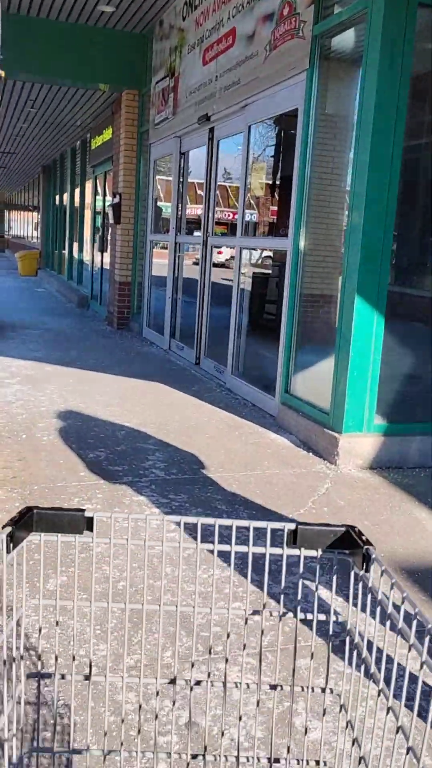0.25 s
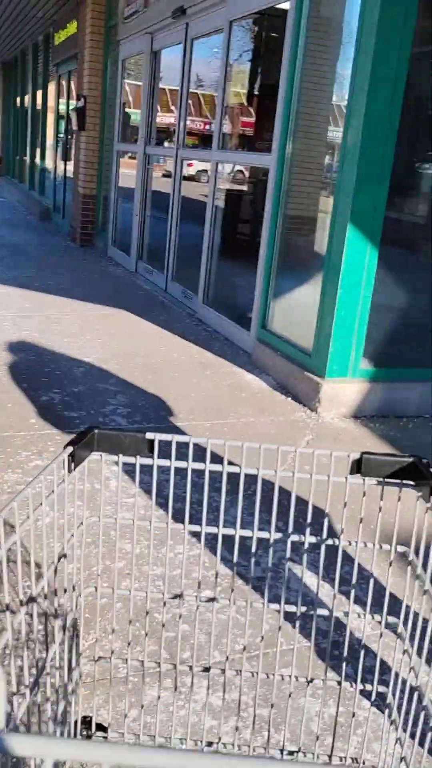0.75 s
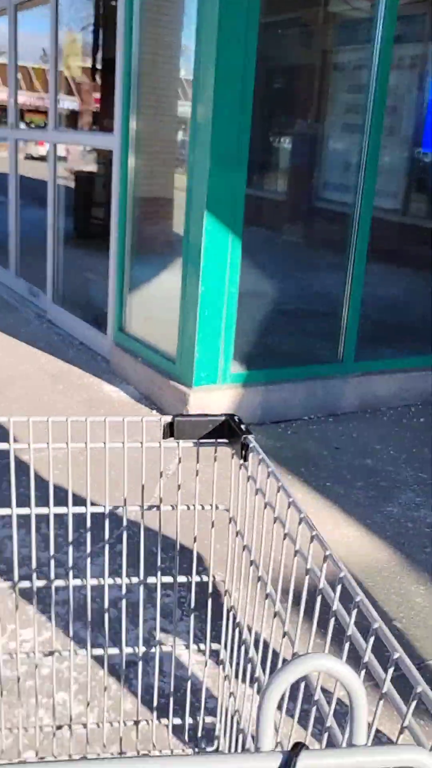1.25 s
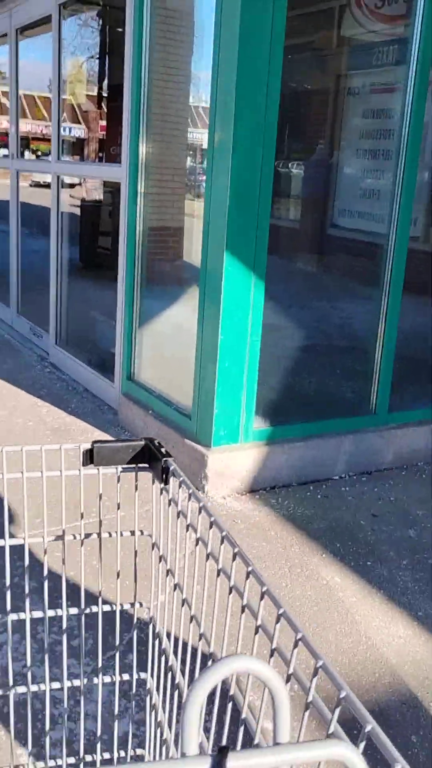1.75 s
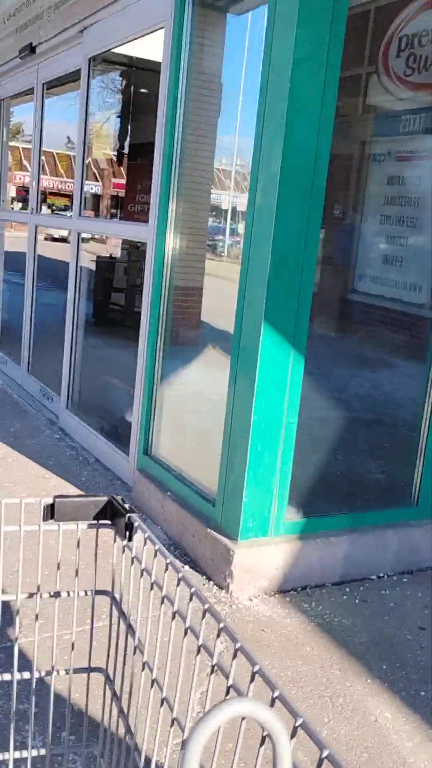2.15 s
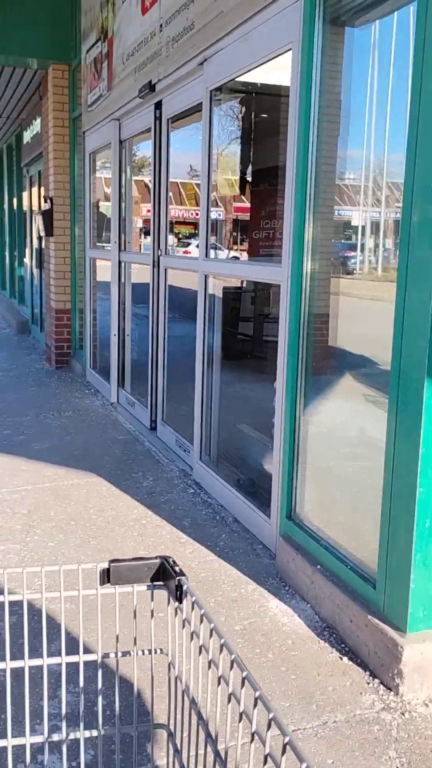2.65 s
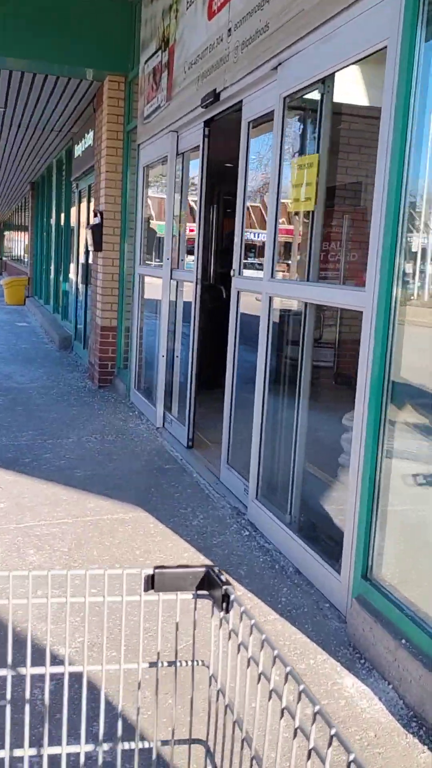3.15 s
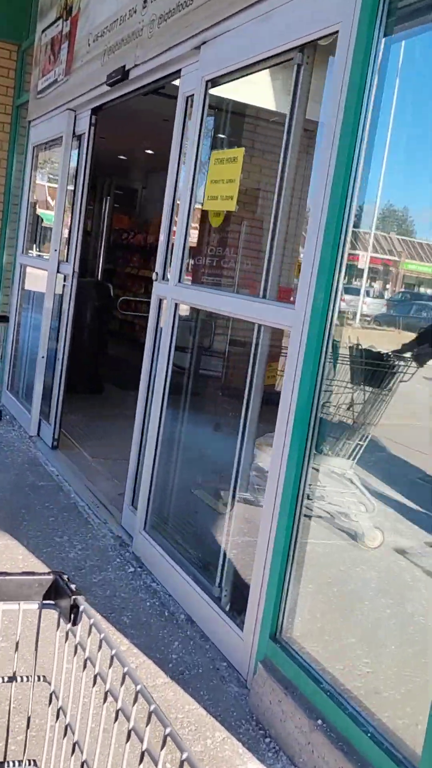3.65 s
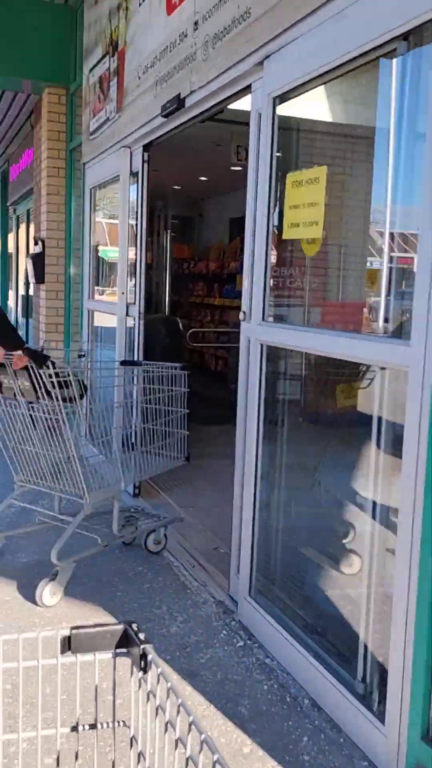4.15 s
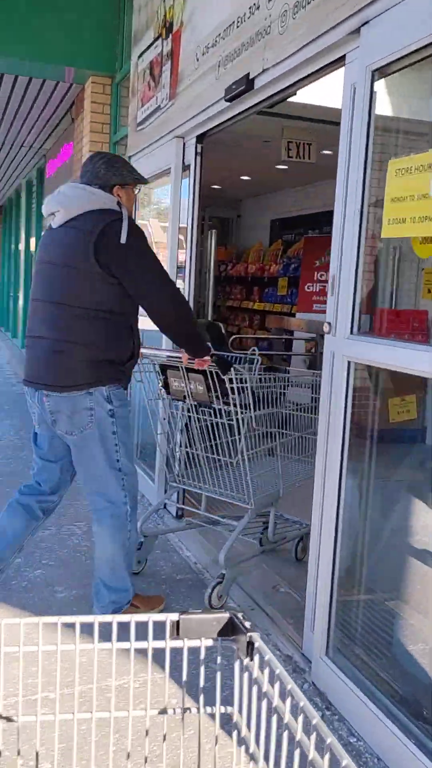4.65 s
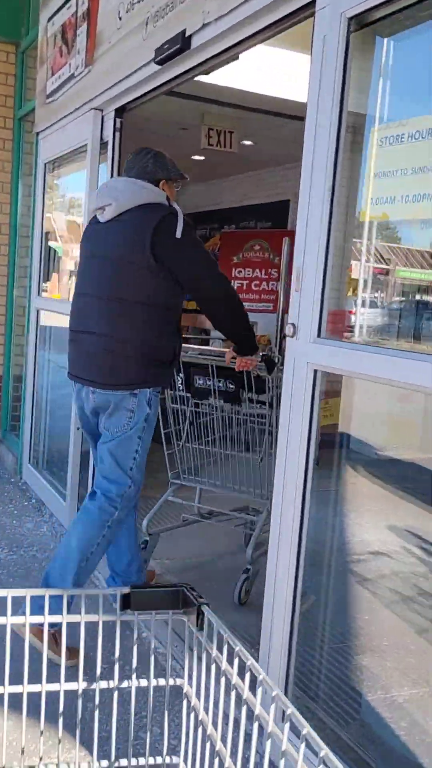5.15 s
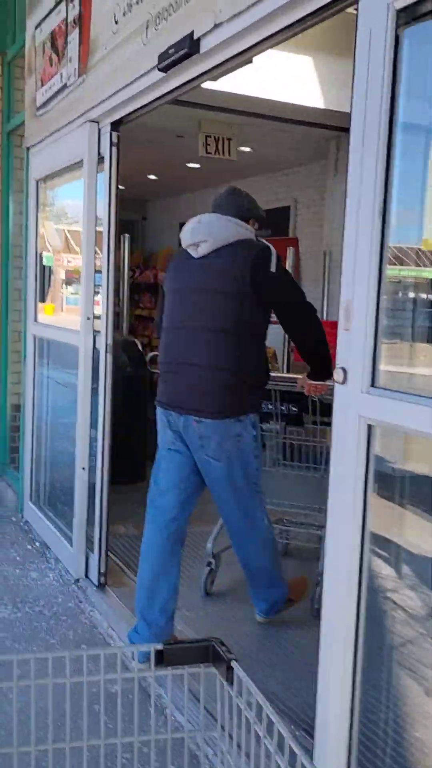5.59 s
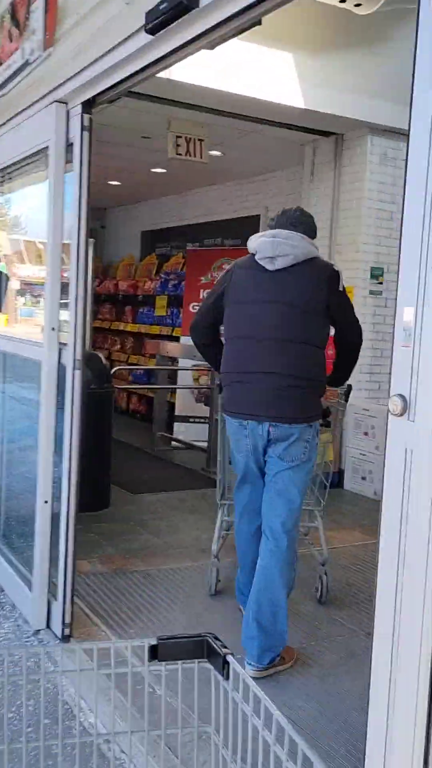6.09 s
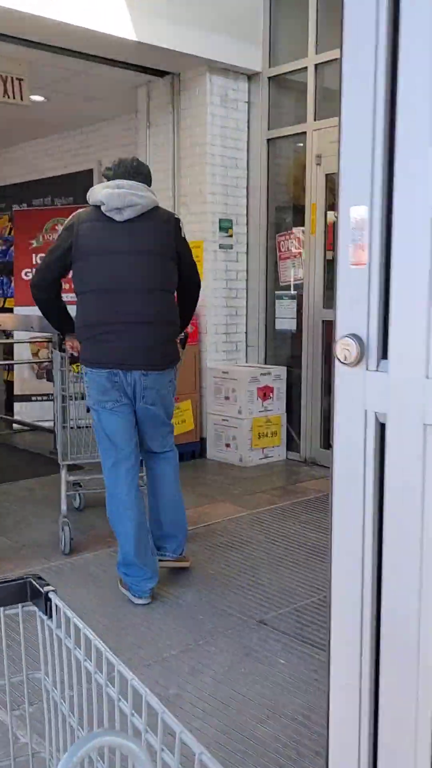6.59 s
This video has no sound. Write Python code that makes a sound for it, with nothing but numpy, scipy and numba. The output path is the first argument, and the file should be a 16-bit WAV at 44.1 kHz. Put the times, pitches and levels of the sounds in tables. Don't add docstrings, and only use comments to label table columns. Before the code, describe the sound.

An empty wire shopping cart rattles loudly and brightly over gritty concrete, then quietens to light ticks and low thuds at a shop entrance.

```python
import sys
import numpy as np
from scipy import signal
from scipy.io import wavfile
from scipy.ndimage import uniform_filter1d
from numba import njit

SR = 44100
rng = np.random.default_rng(int(sys.argv[2]) if len(sys.argv) > 2 else 0)


def natural_amplitude(level_db):
    exponent = np.asarray(level_db, float) / 20
    return 10 ** exponent


def inscribe(sig):
    pcm = np.round(np.clip(np.atleast_2d(sig).T, -1, 1) * 32767)
    wavfile.write(sys.argv[1], SR, pcm.astype(np.int16))


N = 300930
TIME = np.arange(N) / SR
USUAL_DB = -22

# start_s, peak_db, ring_hz, neighbour_spray_db
JOLTS = [(0.062, -5.5, 8630, -5), (0.2227, -7, 9500, -6), (0.2738, -8, 10000, -8), (0.9056, -4.5, 9230, -1),
         (0.963, -9, 4940, 4), (1.2206, -6, 10600, -7), (1.265, -7, 8770, 5), (1.331, 2, 4490, -18),
         (1.617, -3, 4350, 1), (2.0536, -11, 6880, 5.5), (2.2658, -14, 7700, 10.5), (2.3885, -14, 9180, -1),
         (2.423, -4.5, 6630, -1), (2.8384, -9, 7370, 4.5), (2.889, -10, 8600, -9), (2.9281, -5, 7000, -0.5),
         (2.9891, -15, 8070, 0), (3.249, -10, 8500, 4), (3.528, -7, 8500, 3.5), (3.953, -2, 8400, -6),
         (4.025, -6.5, 8100, 3.5), (4.126, -5, 8540, -4), (4.322, -10, 8300, 2), (5.088, -4.5, 4250, 0),
         (5.3327, -13, 4000, -5), (5.875, -15, 10980, -1), (6.1996, -15, 9740, -9), (6.534, -15, 6200, 10),
         (6.682, -17, 7840, -4), (6.799, -11.5, 8040, 6.5)]
# start_s, peak_db, ring_hz, neighbour_spray_db
MORE_JOLTS = [
    (0.1555, -15, 9280, -9),
    (1.683, -1, 9400, -3),
    (1.9795, -14.5, 6400, 2),
    (3.744, -14, 8490, -8),
    (4.796, -15, 8500, 1),
    (5.746, -14.5, 7540, 7),
    (6.053, -18, 8660, -2),
    (6.483, -20, 7200, -1),
]
# time_s, left_minus_right_db
SWAY = [(0, -3), (.55, 1), (.9, -4.5), (1.1, 1.5), (1.27, -4.5), (1.45, 3), (1.6, -3.5), (2.75, -3),
        (3.1, -0.5), (3.3, -4), (4.0, -5.5), (4.25, 0), (4.57, 2), (4.7, -4.5), (5.13, 0.5), (5.35, -3.5),
        (6.3, -1), (6.55, -4)]
# start_s, frame_db, casters_db, thud_db
BUMPS = [(0.05, -45, -26.5, -33), (0.23, -39, -55, -45), (0.6, -38, -22.5, -39), (0.695, -31, -22.5, -45),
         (0.76, -27.5, -26, -39), (1.0, -24.5, -21.5, -33), (1.3, -44, -41, -33), (1.67, -21, -47, -35),
         (1.85, -46, -46, -29.5), (1.98, -26, -37, -51), (2.102, -19, -28.5, -45), (2.33, -45, -46, -27),
         (2.65, -20.5, -42, -47), (2.95, -25, -36, -32), (3.27, -27, -28, -23), (3.42, -29, -33, -25),
         (3.6, -27.5, -45, -40), (3.77, -25, -34, -22.5), (4.36, -21, -31, -26), (4.46, -20.5, -26, -28),
         (4.62, -27, -28, -29), (4.78, -46, -40, -22.5), (5.0, -37, -44, -27), (5.2, -41, -51, -28),
         (5.37, -25, -34, -21.5), (5.45, -22.5, -32, -37), (6.23, -27.5, -38, -32), (6.43, -56, -55, -28),
         (6.55, -50, -25, -40), (6.8, -46, -31, -28)]
# time_s, level_db
DRAUGHT = [(0, -70), (1.5, -53), (2.3, -44), (3.15, -44), (3.25, -37), (4.05, -34.5), (4.15, -39),
           (4.52, -43), (4.62, -31.5), (5.3, -38.5), (5.5, -37.5), (6.82, -52)]


def curves(table, t):
    s, *columns = np.transpose(table)
    return [np.interp(t, s, c) for c in columns]


def colour(table, hz):
    table = np.array(table)
    return np.interp(np.log(hz), np.log(table[:, 0] + 1), table[:, 1])


@njit
def ring(start, hz, t60, rise, gain, phase):
    out = np.zeros(N)
    for k in range(len(start)):
        turn = np.exp(2j * np.pi * hz[k] / SR - np.log(1000) / (t60[k] * SR))
        z = gain[k] * np.exp(1j * phase[k])
        soft, soften = 1., np.exp(-1 / (rise * SR))
        first = max(int(start[k] * SR), 0)
        last = min(int((start[k] + .55 * t60[k]) * SR), N)
        for i in range(first, last):
            soft *= soften
            out[i] += z.imag * (1 - soft)
            z *= turn
    return out


def knocks(t, hz, t60, peak_db, pan_db, chance, scatter, rise):
    # time_s, lag_s, left_path_rarity
    paths = [(0, .0003, 1.2), (.55, .0003, 1.5), (.8, .00045, 1.5), (1.75, .00039, 1.2), (2.0, .00047, .3),
             (2.8, .00047, -.1), (3.0, .00042, 1.2), (4.3, .00048, 1.5), (5.0, .00033, .8),
             (5.5, .00039, 1.2), (6.5, .00045, 1)]
    lag_s, rarity = curves(paths, t)
    from_left = (chance[:, 2] > rarity) & (hz > 700)
    late = t + np.where(from_left, -lag_s, lag_s) + .00005 * chance[:, 0]
    phase = np.pi * chance[:, 1]
    pan_db = pan_db + 1.56 * chance[:, 2]
    left = ring(late, hz, t60, rise, natural_amplitude(peak_db + pan_db / 2), phase + scatter * chance[:, 3])
    right = ring(t, hz, t60, rise, natural_amplitude(peak_db - pan_db / 2), phase)
    return np.array([left, right])


def swarm(lo_hz, hi_hz, spectrum, t60, rough_db, bunch, count, modes):
    u = rng.random((count, 6))
    t = np.repeat(u[::bunch, 0], bunch)[:count] * N / SR + .0008 * u[:, 3]
    pitches = lo_hz * (hi_hz / lo_hz) ** ((np.arange(modes) + rng.random(modes)) / modes)
    hz = pitches[(u[:, 1] * modes).astype(int)] * (1 + 0.0066 * (u[:, 4] - .5))
    decay = t60 * (0.5 + 1.62 * u[:, 5])
    strength = np.repeat(u[::bunch, 2], bunch)[:count]
    db = colour(spectrum, hz) + 10 * np.log10(hz / decay) - rough_db * np.log(1 - strength)
    energy = np.sum(natural_amplitude(2 * db) * decay) / (4 * np.log(1000))
    return t, hz, decay, db - 10 * np.log10(energy * SR / N)


def swells(t, start, hold, peak_db, rise, fall):
    since = t - start[:, None]
    rise_db = rise * np.minimum(since, 0)
    fall_db = fall * np.maximum(since - hold[:, None], 0)
    return natural_amplitude(2 * (peak_db[:, None] + rise_db - fall_db))


def shaking(when):
    # start_s, length_s, level_db, thin_wires_db,
    # thick_rods_db
    rough_patches = [(0, 0.029, -20.5, -1, 0), (0.268, 0.22, -18.5, 1.5, 0), (0.575, 0, -17.5, 2, 1.5),
                     (0.924, 0.031, -26, 5, 2.5), (0.997, 0.068, -18.5, 1.5, 2),
                     (1.262, 0.014, -21.5, -4, 0), (1.363, 0.13, -22, 1, 4.5),
                     (1.557, 0.16, -20.5, -3, 2.5), (2.072, 0.016, -26.5, -3, 5),
                     (2.286, 0.025, -27.5, -6, -1), (2.45, 0.12, -23.5, -0.5, 0),
                     (2.634, 0.025, -18.5, -4.5, 0.5), (2.902, 0.09, -26, -8, 0),
                     (3.02, 0.025, -16, 4, 0.5),
                     (3.294, 0.022, -21.5, -1, 1.5), (3.406, 0, -20, 0, 0), (3.54, 0.1, -23, -0.5, 0),
                    (3.757, 0.029, -25.5, -4, 0.5), (3.968, 0.18, -21, -1, 0), (4.134, 0.11, -21, 2, 2.5),
                    (4.328, 0.0, -18, -2.5, 2.5), (4.432, 0.032, -15.5, 1, 2.5),
                    (4.564, 0.11, -22, -1.5, 3.5), (4.861, 0.14, -19.5, -0.5, -1),
                    (5.09, 0.075, -18.5, 0, -2), (5.256, 0.22, -18.5, -1, -0.5),
                    (5.886, 0.059, -29, -2, -3), (6.235, 0.12, -27.5, -1, -1), (6.547, 0.039, -26, -0.5, 0),
                    (6.688, 0.13, -28.5, -3, -1),
                     (.69, 0.017, -26.5, -3, 8.5),
        (1.73, 0.017, -21.5, -2, 2),
        (1.922, .06, -34, -24, -4),
        (5.955, 0.1, -38, -1, -6),
    ]
    # time_s, level_db
    hops = [(.155, 0.5), (.205, -6), (.39, 4), (.43, -2.5), (.48, 2), (1.31, 0.5), (1.4, 3.5), (1.5, -3),
            (1.682, -5.5), (1.71, 0.5), (1.785, -2), (1.84, -11), (1.961, 0), (2.01, -4.5), (2.2, -4),
            (2.36, -3), (3.125, 3.5), (3.45, 6.5), (3.65, 2), (3.71, -1.5), (4.02, -4), (4.77, -3),
            (5.489, 4.5), (5.62, -3.5), (5.69, -1.5), (5.93, -9), (6.17, 1.5), (6.41, 1), (6.47, -3),
            (6.63, 0)]
    slows_s, on_mat_s = 5.58, 6.24
    rest_db, mat_rest_db = -28.5, -38
    t = TIME[::64]
    start, hold, peak_db, thin_db, thick_db = np.transpose(rough_patches)
    power = swells(t, start, hold, peak_db, rise=230, fall=82)
    total = power.sum(axis=0) + natural_amplitude(2 * np.interp(t, [slows_s, on_mat_s], [rest_db, mat_rest_db]))
    hop_s, hop_db = np.transpose(hops)
    hop_db = hop_db @ np.exp(-((t - hop_s[:, None]) / 0.012) ** 2 / 2)
    at_rest = 1 - power.sum(axis=0) / total
    level_db = 10 * np.log10(total) + hop_db
    over = level_db - USUAL_DB - np.interp(t, [slows_s, on_mat_s], [0, mat_rest_db - rest_db])
    thin_db = -5 - 0.17 * over + thin_db @ power / total + .5 * hop_db - 6.5 * at_rest
    thick_db = -3.5 - 0.28 * over + thick_db @ power / total
    pan_db = 0.9 + 0.03 * over + 0.94 * curves(SWAY, t)[0]
    return [np.interp(when, t, db) for db in (level_db, thin_db, thick_db, pan_db)]


def aftershock(t, kick_db, fade_s):
    hit = np.sort(np.array(JOLTS + MORE_JOLTS)[:, 0])
    since = t - hit[np.maximum(np.searchsorted(hit, t) - 1, 0)]
    return kick_db * np.exp(-np.abs(since) / fade_s) * (since > 0)


def wires(t60, rough_db, share_db, scatter, bunch, count):
    # pitch_hz, level_db (per Hz)
    mesh = [(2000, -6), (2150, -7.5), (2700, -4.5), (3250, -5), (3950, -3), (4420, -3.5), (4520, -3),
            (5000, -5), (5500, -3.5), (7700, -3), (8430, -2), (10500, -3), (13300, -5), (14400, -6.5)]
    t, hz, t60, db = swarm(2000, 14400, mesh, t60, rough_db, bunch, count, modes=4000)
    level_db, thin_db, thick_db, pan_db = shaking(t + 0.004)
    thin = np.clip(np.log2(hz / 8500) * 2.0, 0, 1)
    thick = np.clip(np.log2(6500 / hz) * 1.0, 0, 1)
    db = db + level_db + share_db
    db = db + (0.54 + 0.74 * thin) * aftershock(t, kick_db=5.5, fade_s=0.013)
    db = db + thin * (thin_db + 3.0) + thick * (thick_db + 3.0)
    pan_db = pan_db + 0.87 * np.log2(hz / 6000)
    return knocks(t, hz, t60, db, pan_db, rng.standard_normal((len(t), 4)), scatter, rise=0.000066)


def rods():
    # pitch_hz, under_shaking_db,
    # left_minus_right_db
    rods_and_bars = [(8100, -19, 5), (8030, -16, -5), (8560, -15, -2), (8560, -18, -7), (9108, -17, 7),
                     (9270, -15, -4), (9700, -18, 6), (9800, -17, 19), (10260, -25, 10), (11100, -15, 10),
                     (10981, -28, 8), (11800, -18, 13), (12403, -23, 6), (14080, -17, -6),
                     (2155, -18.5, 10), (2680, -18, 8), (3500, -27, -8), (4460, -16, -6), (4390, -17, -7),
                (6640, -20.5, 0), (7040, -14.5, -11)]
    singing = np.transpose(rods_and_bars)
    u, chance = rng.random((1900, 3)), rng.standard_normal((1900, 5))
    hz, db, side_db = singing[:, (u[:, 1] * singing.shape[1]).astype(int)]
    hz = hz * (1 + .002 * chance[:, 4])
    t = u[:, 0] * N / SR
    level_db, *_, pan_db = shaking(t + 0.0082)
    db = db + level_db + 6.0 - 0.94 * np.log(1 - u[:, 2])
    return knocks(t, hz, np.full(len(t), .14), db, pan_db + side_db, chance, scatter=1.0, rise=0.00061)


def basket():
    free = wires(t60=0.098, rough_db=0.9, share_db=3.0, scatter=1.83, bunch=5, count=50000)
    welded = wires(t60=0.0086, rough_db=2.0, share_db=-2.5, scatter=1.34, bunch=20, count=120000)
    return free + welded + rods()


def bumped(t, steady_db, bump_db, fall):
    start = np.array(BUMPS)[:, 0] - 0.0054
    bumps = swells(t, start, 0 * start, bump_db, 304, fall).sum(axis=0)
    return 10 * np.log10(natural_amplitude(2 * steady_db) + bumps)


def rolling(t):
    # time_s, roughness_db, hardness_db, frame_load_db
    ground = [(0, -35.5, 4.5, -25), (0.5, -33, 1.5, -26.5), (0.85, -31, -3, -32.5), (1.3, -32, 3, -30.5),
              (1.75, -29.5, -1, -29.5), (1.9, -36, 7.5, -28), (2.3, -36.5, 8.5, -29), (2.7, -35, 5.5, -22),
              (2.85, -37.5, 9, -32), (3.5, -38, 3.5, -32), (4.25, -37, -0.5, -31.5), (4.5, -35, 5, -26.5),
              (4.8, -38.5, 0.5, -29.5), (5.4, -37, 6.5, -28.5), (5.7, -37, -0.5, -33),
              (6.1, -39, -4.5, -41), (6.4, -38.5, -2, -35.5), (6.82, -36.5, -3, -31.5)]
    bump_fall = 164
    rough_db, hard_db, load_db = curves(ground, t)
    _, frame_db, caster_db, thud_db = np.transpose(BUMPS)
    over = shaking(t)[0] - USUAL_DB
    soft_db = rough_db + 0.17 * over
    frame = bumped(t, load_db + 0.07 * over, frame_db, bump_fall)
    casters = bumped(t, soft_db, caster_db - 5.5, bump_fall)
    grit = bumped(t, soft_db + hard_db, (caster_db + frame_db) / 2 - 9, bump_fall)
    roll_db = -35 + 0.28 * (curves(DRAUGHT, t)[0] + 35)
    return frame, casters, grit, bumped(t, roll_db, thud_db - 3.5, fall=122)


def chassis():
    # pitch_hz, level_db (per Hz)
    caster_spectrum = [(120, -30), (200, 1), (260, -7.5), (399, -9.5), (532, -7.5), (1150, -6.5),
                       (1500, -7.5), (1950, -35), (3300, -120)]
    tubes = [(1480, -15.0), (1640, -1.5), (1780, 0.0), (1900, -5.5), (2050, -30.0)]  # pitch_hz, level_db
    t, hz, t60, db = swarm(1472.0, 2036, tubes, t60=0.037, rough_db=1.65, count=9000, modes=90, bunch=2)
    db = db + rolling(t + 0.0089)[0] + 0.046
    pan_db = -2.5 + curves(SWAY, t)[0]
    frame = knocks(t, hz, t60, db, pan_db, rng.standard_normal((len(t), 4)), scatter=1.6, rise=0.00098)

    t, hz, t60, db = swarm(209.8, 1523.0, caster_spectrum, t60=0.027, rough_db=-1.2,
                           count=24000, modes=300, bunch=6)
    _, soft_db, grit_db, *_ = rolling(t + 0.0067)
    bright = np.clip(np.log2(hz / 650) * 0.74, 0, 1)
    db = db + soft_db + bright * (grit_db - soft_db) + 6.5
    db = db + 4.3 * np.exp(-((t - 5.35) / 0.5) ** 2 - ((hz - 970) / 130) ** 2)
    pan_db = -1.5 + curves(SWAY, t)[0]
    scatter = 0.05 + 0.56 * np.log2(hz / 210)
    return frame + knocks(t, hz, t60, db, pan_db, rng.standard_normal((len(t), 4)), scatter, rise=0.00078)


def draught(t):
    # start_s, level_db
    gusts = [(0.03, -39), (0.32, -37), (0.5, -53), (0.77, -33), (0.97, -54.5), (1.38, -46), (1.8, -41),
             (2.42, -36), (2.55, -34), (2.99, -30), (3.28, -24), (3.74, -33), (4.07, -35), (4.75, -24),
             (5.2, -28), (5.36, -24), (5.84, -26), (6.36, -22), (6.67, -33)]
    start, gust_db = np.transpose(gusts)
    puffs = swells(t, start, 0 * start, gust_db - 3.5, rise=200, fall=150).sum(axis=0)
    return 10 * np.log10(natural_amplitude(2 * curves(DRAUGHT, t)[0]) + puffs)


def rumble():
    # pitch_hz, level_db (per Hz)
    rumble_spectrum = [(28, -37), (45, -32), (62, -5.5), (97, -1.5), (150, 0), (260, -17.5)]
    t, hz, t60, db = swarm(27.14, 262.2, rumble_spectrum, t60=0.11, rough_db=0.2, count=4000, modes=200, bunch=1)
    level_db = rolling(t + 0.026)[-1]
    deep = np.clip(np.log2(125 / hz) * 2.8, 0, 1)
    db = db + level_db + 5.5 + deep * (draught(t + 0.02) - level_db + 6.0)
    chance = rng.standard_normal((len(t), 4))
    return knocks(t, hz, t60, db, -3.5, chance, scatter=1.0 + 2.3 * deep, rise=0.0042)


def strikes(table, t60, octaves, smear_s, trim_db, pan_db, scatter, rise, count):
    t, peak_db, hz = np.repeat(np.transpose(table), count, axis=1)
    chance = rng.standard_normal((len(t), 6))
    hz = np.minimum(hz * 2 ** (octaves * chance[:, 4]), 14000)
    t = t + smear_s * np.abs(chance[:, 5])
    return knocks(t, hz, np.full(len(t), t60), peak_db + trim_db, pan_db, chance, scatter, rise)


def thumps():
    # start_s, peak_db, pitch_hz
    joints = [(0.026, -24, 132), (0.589, -19, 169), (0.747, -17.5, 161), (1.256, -25, 175),
              (1.45, -26, 192), (1.551, -28, 197), (1.638, -16.5, 163), (2.312, -24, 129),
              (3.245, -13, 131), (3.359, -27, 153), (3.474, -19, 78.1), (3.597, -20, 138),
              (4.058, -23, 82.5), (4.607, -15, 120.6), (4.659, -15, 100), (4.731, -24, 103),
              (4.789, -20, 109), (4.924, -19, 112), (5.061, -15, 134), (5.183, -11, 124),
              (5.244, -16, 91.5), (5.344, -12, 109), (5.812, -21, 93), (5.931, -17, 108), (6.212, -17, 160),
              (6.53, -14, 160), (6.661, -13, 110)]
    return strikes(joints, t60=.11, octaves=.01, smear_s=0.0015, trim_db=3.0, pan_db=-5.0,
                   scatter=0.36, rise=0.011, count=1)


def stem_knocks():
    # start_s, peak_db, centre_hz
    stems = [(0.055, -27, 866), (0.379, -20, 522), (0.581, -20, 552), (0.692, -10, 927), (0.982, -19, 458),
             (1.101, -22, 509), (1.264, -13, 1250), (1.358, -21, 620), (1.403, -15, 1100),
             (1.451, -22, 683), (1.51, -15, 1280), (1.557, -14, 455), (2.085, -19, 1340), (2.17, -14, 1240),
             (2.489, -24, 1340), (2.836, -21, 373), (2.938, -21, 1310), (3.252, -21, 519),
             (3.317, -18, 730), (3.67, -19, 645), (4.125, -23, 519), (4.155, -20, 666), (4.209, -19, 650),
             (4.449, -16, 1200), (5.065, -21, 1120), (5.37, -16, 967), (6.534, -29, 445),
             (6.794, -19.5, 334)]
    return strikes(stems, t60=0.035, octaves=0.425, smear_s=0.00122, trim_db=-8.0, pan_db=-2.5,
                   scatter=0.74, rise=0.0014, count=8)


def jolts():
    t, peak_db, hz, spray_db = np.repeat(np.transpose(JOLTS + MORE_JOLTS), 16, axis=1)
    chance = rng.standard_normal((len(t), 6))
    part = np.arange(len(t)) % 16
    rod = part < 2
    hz = np.where(rod, hz * (1 + 0.0213 * part), 14000 * 2 ** -np.abs(1.3 * chance[:, 4]))
    t = t + np.where(rod, 0, .0015 * np.abs(chance[:, 5]))
    t60 = np.where(rod, .09, .015)
    db = peak_db + np.where(rod, -11., spray_db - 10.0)
    return knocks(t, hz, t60, db, -1.5, chance, scatter=0.99, rise=0.00092)


def ticks():
    # start_s, peak_db, centre_hz
    wire_ticks = [(0.2488, -1, 9500), (0.7994, -10, 10440), (0.8834, -23, 10900), (1.0024, -15, 9970),
                  (1.2536, -13, 8770), (1.358, -5, 8500), (1.3897, -2, 9050), (1.6107, -16, 8690),
                  (1.755, -6, 9150), (1.9799, -11, 7600), (2.264, -12, 12760), (2.5324, -6, 9660),
                  (3.0011, -10, 8650), (3.299, -4, 8600), (3.4375, -6, 8410), (4.147, -6, 9100),
                  (4.25, -8, 8500), (4.431, -9, 8360), (4.7884, -15, 8700), (5.4814, -10, 8200),
                  (5.6044, -7, 10000), (5.6546, -19, 8050), (5.875, -13, 11100), (6.1993, -18, 9740),
                  (6.4813, -13, 7200), (6.5494, -8, 7800)]
    return strikes(wire_ticks, t60=0.013, octaves=0.554, smear_s=0.00054, trim_db=-16.5, pan_db=-4.0,
                   scatter=3.3, rise=.0001, count=24)


def clacks():
    # start_s, peak_db, centre_hz
    rod_clacks = [(0.2972, -18, 4500), (0.6923, -12, 2430), (0.9088, -32, 4150), (1.2476, -20, 3930),
                  (1.271, -16, 4360), (1.4056, -11, 4047), (1.707, -10, 4690), (2.2677, -13, 4580),
                  (3.3623, -15, 3960), (3.4072, -4.5, 4580), (3.5444, -12, 4530), (3.7554, -9, 4560),
                  (3.9886, -18, 4290), (4.0677, -6, 4010), (4.135, -16, 4160), (5.146, -15, 4460),
                  (5.7493, -24, 4000), (6.0003, -22, 4500), (6.1519, -26, 4260), (6.2347, -22, 4120),
                  (6.5839, -23, 4000)]
    return strikes(rod_clacks, t60=0.032, octaves=0.62, smear_s=.0015, trim_db=-15.5, pan_db=-9.0,
                   scatter=0.85, rise=0.00033, count=16)


def entrance_hum():
    waver = natural_amplitude(130 * uniform_filter1d(rng.standard_normal(N), size=1500))
    near = np.clip((TIME - 4.5) / 0.61, 0, 1) * waver
    return near * natural_amplitude(-32.0) * np.sin(2 * np.pi * 96.3 * TIME)


def echoes(cart):
    echo = 0
    for lag_s, sway_hz, db in [(.0061, 0.25, -16.5), (.0137, 0.2, -17.5), (.023, 0.53, -12.5)]:
        heard = TIME - lag_s * (1 + .12 * np.sin(2 * np.pi * sway_hz * TIME))
        echo = echo + natural_amplitude(db) * np.array([np.interp(heard, TIME, side) for side in cart[::-1]])
    return echo


def cancelled(x):
    # time_s, lower_hz, lower_depth_db, upper_hz, upper_depth_db
    upper_bands = [(0, 2880, 3, 5000, 4), (.7, 2850, 0, 5000, -0.5), (1.9, 3140, 1, 5250, 0),
                   (2.5, 3200, 1, 5200, 4), (3.2, 3100, 1.5, 5000, 2.5), (3.7, 3104, 3, 4950, 2),
                   (4.2, 3300, 6.5, 4950, 2), (4.55, 3200, 2.5, 4950, 1.5), (5.15, 3216, 3, 5000, -2),
                   (5.45, 3260, -0.5, 5100, 0.5), (6.3, 3250, 4, 5500, 4), (6.82, 3200, 0, 5200, -1)]
    # time_s, centre_hz, depth_db
    lowest_band = [(0, 1100, 2.5), (1.3, 1100, 0), (1.7, 1050, 0.5), (2.1, 1100, 0.5), (2.4, 1070, 1.5),
                   (3.2, 1098, 7.5), (3.6, 951, 4), (4.3, 1070, 2.5), (5.0, 1180, -0.5), (5.7, 1200, 10),
                   (6.2, 1290, -0.5), (6.82, 1200, 3)]
    hz, t, z = signal.stft(x, SR, nperseg=1024)
    low_hz, low_db, high_hz, high_db = curves(upper_bands, t)
    lowest_hz, lowest_db = curves(lowest_band, t)
    # centre_hz, depth_db, width_hz
    bands = [(low_hz, low_db, 266), (high_hz, high_db, 266), (lowest_hz, lowest_db, 140)]
    loss_db = sum(db * np.exp(-((hz[:, None] - at) / width) ** 2) for at, db, width in bands)
    shared = (z[0] + z[1]) / 2 * natural_amplitude(-loss_db)
    apart = (z[0] - z[1]) / 2 * natural_amplitude(-0.4 * loss_db)
    return signal.istft(np.array([shared + apart, shared - apart]), SR, nperseg=1024)[1][:, :N]


def scene():
    cart = basket() + chassis() + jolts()
    blows = thumps() + stem_knocks() + ticks() + clacks()
    return cancelled(cart + echoes(cart) + rumble() + blows + entrance_hum())


def band_limit(x):
    return signal.sosfilt(signal.butter(12, 14270, fs=SR, output="sos"), x)


def record(dry):
    bass_cut = signal.butter(2, 44, "high", fs=SR, output="sos")
    mix = np.clip(signal.sosfilt(bass_cut, dry), -.85, .85)
    return band_limit(mix)


dry = scene()
out = record(dry)
inscribe(out)
```